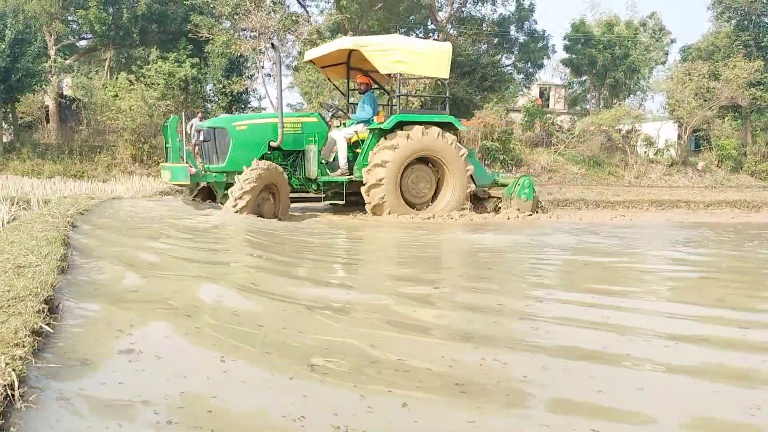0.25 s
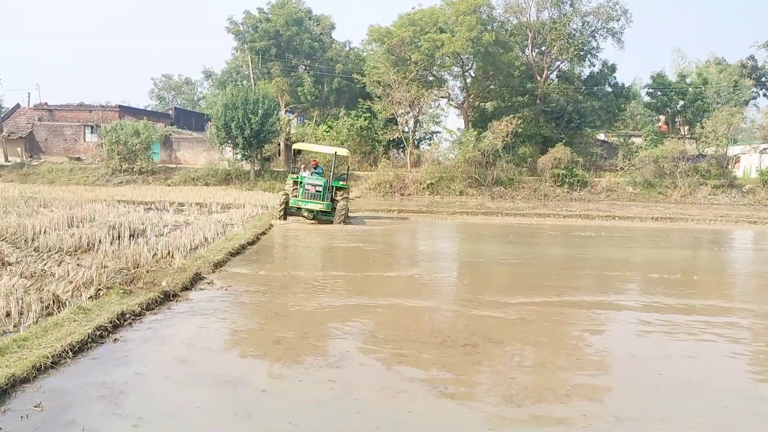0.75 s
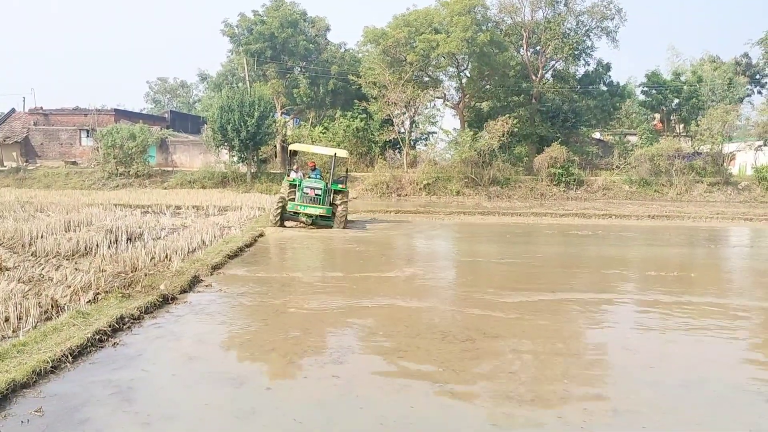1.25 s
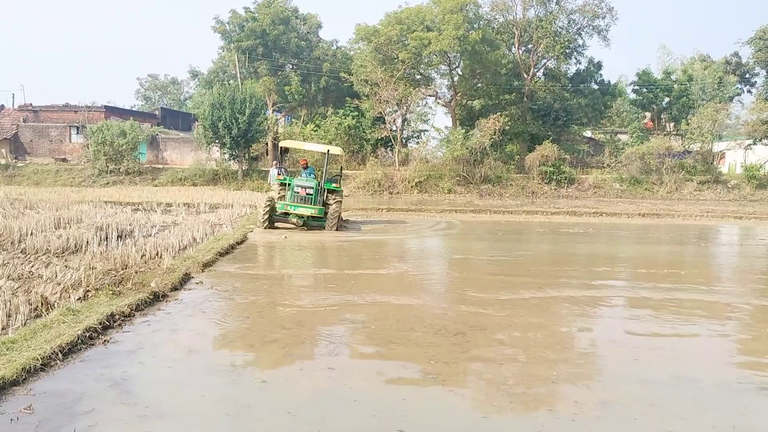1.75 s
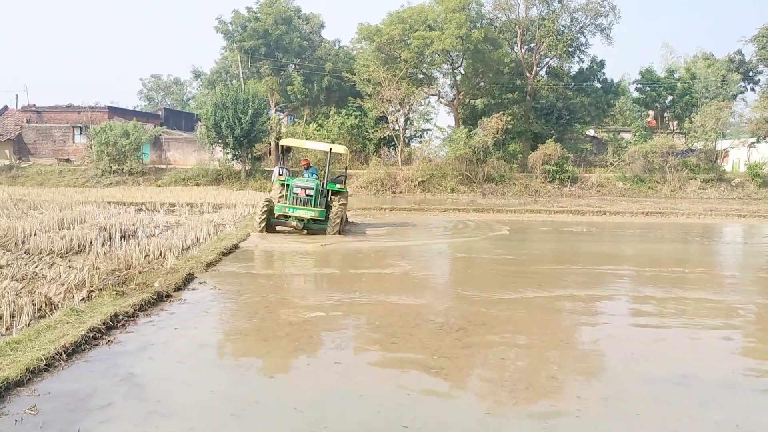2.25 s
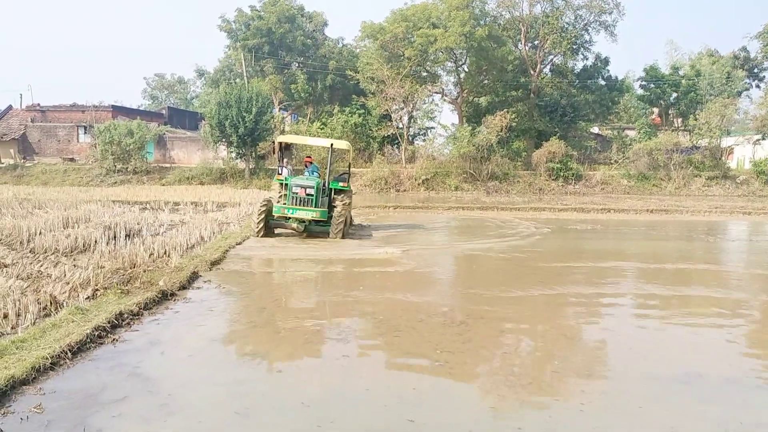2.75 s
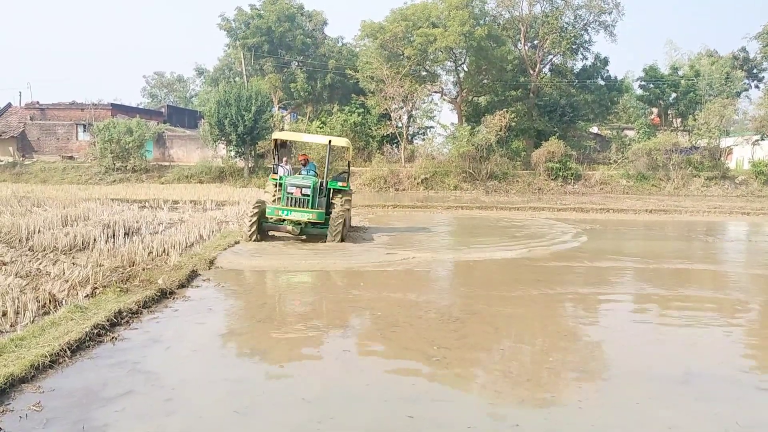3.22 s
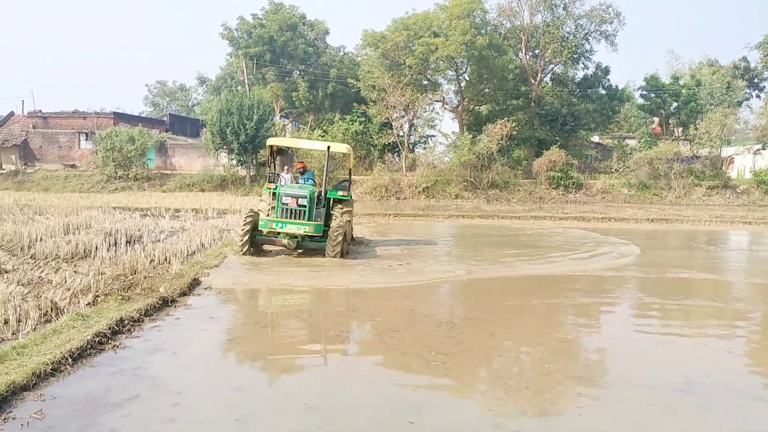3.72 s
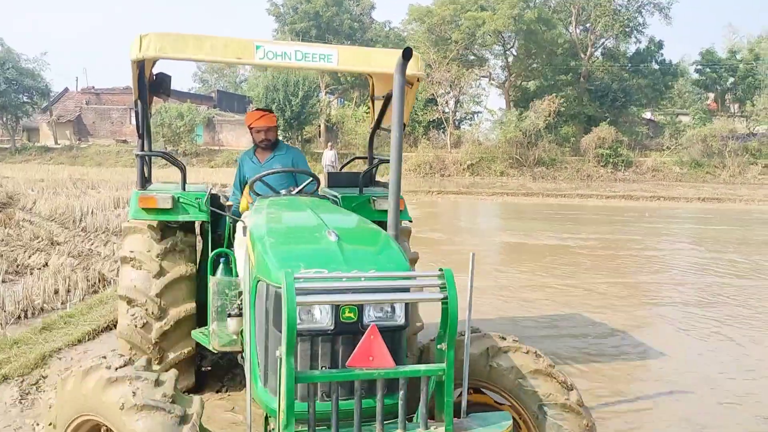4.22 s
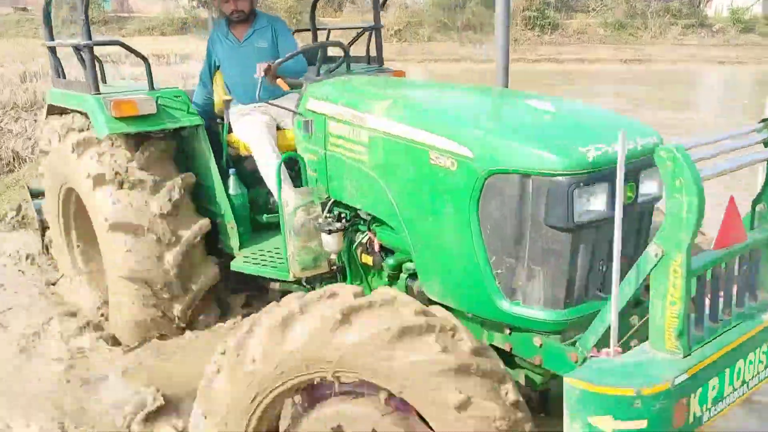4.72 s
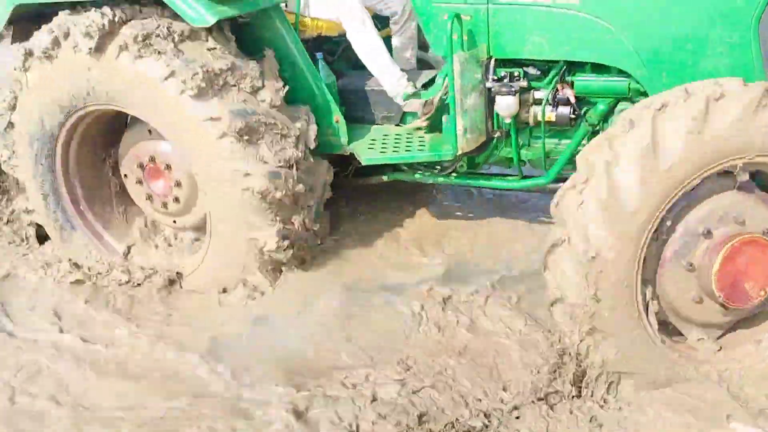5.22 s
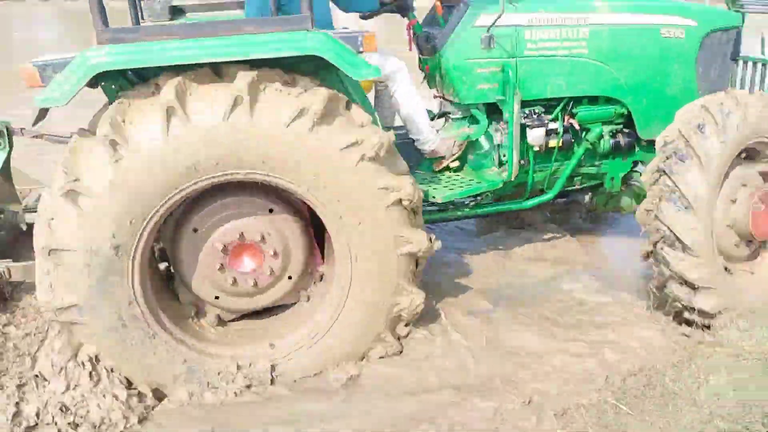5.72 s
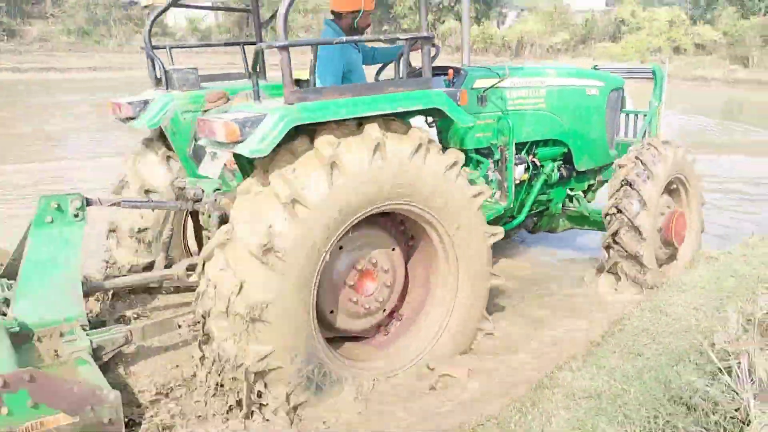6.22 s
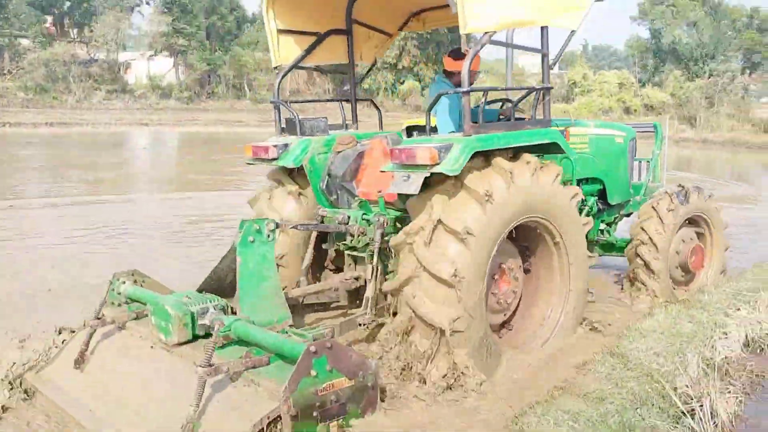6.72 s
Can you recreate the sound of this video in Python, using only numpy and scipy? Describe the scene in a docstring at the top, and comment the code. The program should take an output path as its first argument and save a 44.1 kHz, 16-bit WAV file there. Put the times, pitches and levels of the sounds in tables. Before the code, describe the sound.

Rapid diesel throbbing and clatter, distant and slowly growing, drop out for a moment before a loud close pass with gear whine, drone and watery slaps.

```python
"""A diesel tractor drags a rotavator through a flooded paddy, heard from three places in turn.
It starts side-on: each firing sends a pulse out of the exhaust and shakes up rumble, clatter and knock.
Soon it is far across the water, slowly growing louder, with runs of injector ticking.
After a moment of silence it passes close by: first the gears whine, then the gearbox rasps, the rotavator
drones, a thin whistle goes past, and near the end a rough, slapping wash swells at 1.5 and 5.7 kHz."""
import sys
import numpy as np
from scipy import signal
from scipy.fft import rfft, irfft
from scipy.io import wavfile

SR = 44100
rng = np.random.default_rng(int(sys.argv[2]) if len(sys.argv) > 2 else 0)


def digitize_waveform(pressure):
    """Quantize a signal to 16-bit integers and store it at the path in sys.argv[1].

    Rows of a 2-D input are taken as channels; values are limited to [-1, 1].
    """
    field = np.atleast_2d(pressure).T
    bounded = np.clip(field, -1, 1)
    quanta = np.round(bounded * 32767).astype(np.int16)
    wavfile.write(sys.argv[1], SR, quanta)


N = 306936
TIME, HZ = np.arange(N) / SR, np.fft.rfftfreq(N, 1 / SR)  # time of each sample, frequency of each bin

# when the far place begins, the silence begins and the close pass begins [s]
FAR_AT, SILENT_AT, NEAR_AT = 0.24, 3.9256, 4.256

# engine speed, held by the governor but sagging once under load: (time [s], rate [firings per second])
SPEED = [(0, 38.75), (0.65, 38.1), (1.35, 38.0), (2.15, 37.6), (2.6, 38.0), (3.3, 37.85), (4.7, 37.95),
         (5.13, 36.2), (5.43, 38.2), (6.96, 37.85)]
# the beat skips ahead (+) or back (-) by part of a firing: (time [s], skip [cycles])
SKIPS = [(0.249, .33), (1.355, -0.3727), (1.845, -0.4034), (1.96, -.35), (2.445, -.28), (2.77, 0.465),
         (3.075, -0.3326), (3.375, -0.334), (3.489, -0.279), (3.864, -0.2506), (4.25, 0.4495),
         (4.798, 0.449), (5.285, 0.3955), (5.449, 0.496), (5.572, -0.486), (5.77, -0.407), (6.321, 0.371),
         (6.445, -0.189), (6.658, .45), (6.76, -.45)]
# make-up of the exhaust pulse at each place: (multiple of the firing rate [-], relative level [dB])
SIDE_ORDERS = [(2, 4), (3, 3), (4, 1.5), (5, -21), (6, -16), (7, -31.5), (8, -7.5), (9, -20), (10, -6)]
FAR_ORDERS = [(2, -0.5), (3, -0.5), (4, -1), (5, -47.5), (6, -9.5), (7, -14), (8, -6.5), (9, -11.5),
              (10, -24)]
NEAR_ORDERS = [(2, -1.5), (3, -4.5), (4, -4), (5, -13.5), (6, -31), (7, -18.5), (8, -15.5), (9, -28),
               (10, -16)]
# colour of the engine noise at each place: (frequency [Hz], relative level [dB per Hz])
SIDE_COLOUR = [(60.0, -6.5), (150.0, -2), (330.0, -4), (520.0, -6.5), (850.0, -18), (1500.0, -19.5),
               (2300.0, -26), (3000.0, -17.5), (3900.0, -25.5), (4900.0, -28.5), (7000.0, -28.5),
               (8800.0, -46), (12000.0, -40), (15700.0, -42)]
FAR_COLOUR = [(60.0, -4.5), (150.0, 0), (330.0, -3), (520.0, -2.5), (850.0, -8), (1500.0, -16.5),
              (2300.0, -9.5), (3000.0, -16), (3900.0, -23), (4900.0, -32.5), (7000.0, -32), (8800.0, -49),
              (12000.0, -41.5), (15700.0, -46.5)]
NEAR_COLOUR = [(60.0, -3.5), (150.0, -2), (330.0, 1), (520.0, -1.6), (850.0, -5.5), (1500.0, -15.5),
               (2300.0, -13.5), (3000.0, -12.5), (3900.0, -18), (4900.0, -26), (7000.0, -27.5),
               (8800.0, -42.5), (12000.0, -34), (15700.0, -37)]
# notches in each microphone port's own colour; a plus level is a slight lift:
# (frequency [Hz], width [Hz], level [dB])
SIDE_NOTCHES = ([(500, 150, 1), (1065, 120, -34), (1630, 230, -28)], [(660, 300, 1), (1600, 400, -7),
                (8500, 2300, -2)])  # two lists: left port, right port
FAR_NOTCHES_LEFT = [(516, 388, -17.8), (1288, 478, -9.6), (2218, 800, -22), (3006, 599, -9.8),
                    (5180, 450, -10)]
FAR_NOTCHES_RIGHT = [(637, 400, -22.2), (1690, 250, -9), (5200, 300, -5), (8219, 3858, -20.8)]
NEAR_NOTCHES_LEFT = [(513, 270, -13.5), (2240, 120, -4), (3160, 4100, -4.4)]
NEAR_NOTCHES_RIGHT = [(709, 380, -14.5), (1400, 490, -3), (8750, 1500, -8)]
# how alike the noise is at left and right: (frequency [Hz], likeness [0 to 1])
SIDE_SAME = [(300, 0.98), (900, 0.95), (1600, 0.26), (3500, 0.086)]
FAR_SAME = [(1650, 1.0), (2500, .8), (3500, .45), (6000, .4), (12000, .05)]
NEAR_SAME = [(300, 1), (900, 0.92), (1600, 0.12), (3500, 0.033)]
# layers: exhaust, lowest throb, rumble, growl, rattle, knock, fizz. Far off, each grows as the tractor nears;
# close by, each builds up, then swells as its part of the machine comes abreast:
# (side-on level [dB], far level [dB], far growth [dB per s], close level [dB], change on arrival [dB],
#  time abreast [s], swell width [s], swell [dB])
LAYERS = [(-20, -26.5, 1.26, -21, -4, 5.25, 0.62, 3.5), (-32, -35.5, 0.9, -33.5, -10, 4.6, .85, 9),
          (-25, -28.5, .4, -20, -3, 6.08, 0.37, 3), (-25.5, -34, 0.62, -25.5, -3.5, 4.75, 0.53, 2.5),
          (-34.5, -36, 0.38, -31, -2.5, 4.9, .9, 2.5), (-35, -39.5, 1.21, -30.5, -5, 5.0, 1, 1.5),
          (-47, -62.5, 1.54, -45.5, -12, 5.82, .22, 1)]
# runs of injector ticking: (middle [s], half length [s], level [dB])
TICK_RUNS = [(1.08, 0.24, -43), (1.65, 0.3, -40.5), (2.95, 0.35, -39.5)]
# spells of gear whine, before the left and right gains: (middle [s], half length [s], level [dB])
WHINE_SPELLS = [(4.95, 0.34, -24.5), (5.407, 0.092, -25), (6.85, 0.23, -29.5)]
# the gearbox rasps as it goes past, before the right gain: (middle [s], half length [s], level [dB])
RASP_PASS = [(5.98, 0.63, -32)]
# pitch of the rotavator's drone, dragged down by the mud: (time [s], pitch [Hz])
DRONE_PITCH = [(5.6, 379.4), (6.1, 366), (6.55, 379.6), (6.96, 370.7)]
# spells of the drone, before the left and right gains: (middle [s], half length [s], level [dB])
DRONE_SPELLS = [(5.68, 0.19, -28), (6.11, 0.21, -23), (6.66, 0.32, -21)]
# a thin high whistle, probably the turbocharger, as the engine's side goes past:
# (middle [s], half length [s], level [dB])
WHISTLE_PASS = [(5.82, .2, -50)]
# a rough, slapping wash swells near the end: (middle [s], half length [s], level [dB])
WASH_SWELL = [(6.87, 0.31, -35)]
# the two bands of the wash: (frequency [Hz], width [Hz], relative level [dB])
WASH_BANDS = [(1520, 490, 0), (5700, 1300, -10)]


def amp(db):
    """Turns decibels into a gain."""
    return 10 ** (np.asarray(db) / 20)


def evened(x):
    """Scales a sound to rms 1; a stereo pair is scaled by the average of its two sides."""
    middle = np.atleast_2d(x).mean(0)
    return x / np.sqrt(np.mean(middle ** 2) + 1e-20)


def curves(rows):
    """Reads a table against time, giving each column a value at every sample."""
    times, *columns = np.transpose(rows)
    return [np.interp(TIME, times, column) for column in columns]


def read(points):
    """Reads a table against frequency, giving a value at every bin."""
    hz, value = np.transpose(points)
    return np.interp(np.log(HZ + 1), np.log(hz + 1), value)


def below(hz, order=8):
    """Gain that keeps what lies below a frequency."""
    return 1 / np.sqrt(1 + (HZ / hz) ** (2 * order))


def above(hz, order=8):
    """Gain that keeps what lies above a frequency."""
    return np.sqrt(1 - below(hz, order=order) ** 2)


def resonance(hz, width_hz):
    """Response of a part that rings around one frequency, falling off steeply."""
    return 1 / (1 + 2j * (HZ - hz) / width_hz) ** 2


def wander(hz):
    """A random drift of rms 1, with little change faster than hz."""
    noise = rfft(rng.standard_normal(N))
    return evened(irfft(noise * below(hz, order=3), N))


def hiss(envelope):
    """Spectra of two unrelated noises that rise and fall together."""
    return rfft(rng.standard_normal((2, N)) * evened(envelope))


def spells(rows):
    """Gain that rises, holds and falls around the middle of each spell."""
    return sum(amp(db) * np.exp(-((TIME - middle) / half_s) ** 4) for middle, half_s, db in rows)


def notches(rows):
    """Notches in the colour of one port, each with its swing of phase."""
    response = 1
    for hz, width_hz, db in rows:
        offset = 2j * (HZ - hz) / width_hz
        response = response * (amp(db) + offset) / (1 + offset)
    return response


def ports(left, right, lag_s, left_db=.5):
    """Response of two microphone ports; sound reaches the right one later."""
    delay = np.exp(-2j * np.pi * HZ * lag_s)
    return np.array([amp(left_db) * notches(left), notches(right) * delay])


def layer_levels():
    """Levels in dB of every layer: steady side-on, growing far off, swelling in the close pass."""
    columns = np.transpose(LAYERS)[:, :, None]
    side_db, far_db, growth, close_db, arrival_db, abreast_s, width_s, swell_db = columns
    arriving = np.exp(-np.maximum(TIME - NEAR_AT, 0) / 0.14)  # dies away over 0.14 s
    passing = np.exp(-((TIME - abreast_s) / width_s) ** 2)
    far_now = far_db + growth * (TIME - FAR_AT)
    near_now = close_db + arrival_db * arriving + swell_db * passing
    return side_db, far_now, near_now


def firing_count(jitter=.004, skip_s=0.0062):
    """Counts firings by adding up the engine speed, with slight unevenness and the skips."""
    rate, = curves(SPEED)
    skipped = sum(cycles * (.5 + .5 * np.tanh((TIME - s) / skip_s)) for s, cycles in SKIPS)
    uneven_rate = rate * (1 + jitter * wander(17))
    return .82 + np.cumsum(uneven_rate) / SR + skipped  # .82: where in its cycle the engine starts


def exhaust(turns, orders, exhaust_db, throb_db, rough, spread):
    """One pulse a firing, built of sine waves; the pipe smears the upper ones and no two pulses are alike."""
    pulses = 0
    for k, db in orders:
        flutter = 1 + rough * (wander(9.3) + 1j * wander(18))
        smear = spread * (k - 3) ** 2
        wave = np.exp(2j * np.pi * k * turns - 1j * smear)
        pulses = pulses - amp(db) * (flutter * wave).real
    throb = evened(np.cos(2 * np.pi * turns))
    return amp(exhaust_db) * evened(pulses) - amp(throb_db) * throb


def bursts(turns, delay, decay, uneven_db, steady):
    """Envelope of one dying burst a firing, of varied strength, over a steady part; times in cycles."""
    which, phase = np.divmod(turns - delay + 2, 1)  # + 2 keeps the burst number positive
    strengths = amp(uneven_db * rng.standard_normal(N // 100))
    strength = strengths[which.astype(int)]
    return steady + evened(strength * np.exp(-phase / decay))


def spatter(per_s=70, size_db=3.5, decay_s=0.0017):
    """Envelope of mud clots and drops slapping the water: random hits that die away fast."""
    hits = rng.random(N) < per_s / SR
    drops = hits * amp(size_db * np.minimum(rng.exponential(1, N), 4))
    return signal.lfilter([1], [1, -np.exp(-1 / (decay_s * SR))], drops)


def tractor(turns, levels, orders, colour, pair, same, rough, spread, gas_steady, knock_steady, mud_db, bass_hz):
    """Exhaust pulses plus noise bursts from gas, block and panels, as heard from one place."""
    exhaust_db, throb_db, rumble_db, growl_db, rattle_db, knock_db, fizz_db = levels
    likeness = np.clip(read(same), 0, 1)
    response = amp(read(colour)) * pair

    def heard(noise, db):
        """Colours a noise pair, makes its sides partly alike and sets its level."""
        right = likeness * noise[0] + np.sqrt(1 - likeness ** 2) * noise[1]
        return amp(db) * evened(irfft(np.array([noise[0], right]) * response, N))

    pipe = irfft(rfft(exhaust(turns, orders, exhaust_db, throb_db, rough, spread)) * pair, N)

    # gas rushes out behind each pulse
    gas = hiss(bursts(turns, delay=-.08, decay=0.94, uneven_db=1.7, steady=gas_steady))
    rumble = gas * below(541) * above(bass_hz, order=2)

    # the block and the panels answer higher up
    block = hiss(bursts(turns, delay=.05, decay=0.57, uneven_db=2.5, steady=3.8))
    growl = block * above(593) * below(1590)
    panels = hiss(bursts(turns, delay=0.05, decay=0.23, uneven_db=3, steady=3.6))
    rattle = panels * above(1635) * below(2660)

    # diesel knock: one sharp crack a firing, mixed with the slap of mud
    cracks = hiss(bursts(turns, delay=.02, decay=0.22, uneven_db=4.0, steady=knock_steady))
    cracks = cracks + amp(mud_db) * hiss(spatter())
    knock = cracks * above(3280) * below(8100)

    # finest spray, smoother than the knock
    fizz = (cracks + 1.2 * hiss(np.ones(N))) * above(9200)

    low = pipe + heard(rumble, rumble_db)
    middle = heard(growl, growl_db) + heard(rattle, rattle_db)
    return low + middle + heard(knock, knock_db) + heard(fizz, fizz_db)


def injectors(turns, hz=3870, width_hz=260, decay=0.077):
    """A sharp tick a firing rings the steel of the injection gear."""
    ticks = hiss(bursts(turns, delay=-0.011, decay=decay, uneven_db=1.0, steady=.1))
    shared = ticks + 0.18 * ticks[::-1]  # each side also hears a little of the other
    return spells(TICK_RUNS) * evened(irfft(shared * resonance(hz, width_hz), N))


def gear_tone(hz, rows, rough, waver_hz):
    """A tone from meshing teeth that wavers with the load on them."""
    waver = 1 + rough * (wander(waver_hz) + 1j * wander(waver_hz))
    wave = np.exp(2j * np.pi * np.cumsum(hz) / SR)
    return spells(rows) * evened((waver * wave).real)


def gear_whine(order=19.45, left_db=2.5, right_db=-7):
    """Gears whine at a fixed multiple of the firing rate, mostly at the left."""
    rate, = curves(SPEED)
    return gear_tone(order * rate, WHINE_SPELLS, rough=0.42, waver_hz=22) * amp([[left_db], [right_db]])


def gearbox(hz=2250, width_hz=650, right_db=3):
    """Sliding teeth excite one broad resonance of the gear case."""
    rasp = irfft(hiss(1 + 0.21 * wander(60)) * resonance(hz, width_hz), N)
    return spells(RASP_PASS) * evened(rasp) * amp([[0], [right_db]])


def rotavator_drone(left_db=-3.5, right_db=-.8):
    """The rotavator's gears drone at a pitch dragged down by the mud."""
    pitch, = curves(DRONE_PITCH)
    return gear_tone(pitch, DRONE_SPELLS, rough=0.3, waver_hz=10) * amp([[left_db], [right_db]])


def whistle(hz=12000, width_hz=1100, left_db=-7):
    """Rushing air in one high resonance, mostly at the right port."""
    air = irfft(hiss(np.ones(N)) * resonance(hz, width_hz), N)
    return spells(WHISTLE_PASS) * evened(air * amp([[left_db], [0]]))


def slapping_wash():
    """Random slaps over a steady hiss, ringing in two bands."""
    colour = sum(amp(db) * resonance(hz, width_hz) for hz, width_hz, db in WASH_BANDS)
    slaps = hiss(1.5 + evened(spatter()))
    return spells(WASH_SWELL) * evened(irfft(slaps * colour, N))


def scene():
    """Plays the three listening places one after the other, with silence before the last."""
    turns = firing_count()
    side_levels, far_levels, near_levels = layer_levels()

    side_ports = ports(*SIDE_NOTCHES, lag_s=0.00013)
    side = tractor(turns, side_levels, SIDE_ORDERS, SIDE_COLOUR, side_ports, SIDE_SAME, rough=0.084,
                   spread=.15, gas_steady=1.2, knock_steady=6.1, mud_db=-11.5, bass_hz=130)

    far_ports = ports(FAR_NOTCHES_LEFT, FAR_NOTCHES_RIGHT, lag_s=.000242)
    far = tractor(turns, far_levels, FAR_ORDERS, FAR_COLOUR, far_ports, FAR_SAME, rough=0.13,
                  spread=0.252, gas_steady=1.6, knock_steady=2.8, mud_db=-26.5, bass_hz=125)
    far = far + injectors(turns)

    near_ports = ports(NEAR_NOTCHES_LEFT, NEAR_NOTCHES_RIGHT, lag_s=0.00021)
    near = tractor(turns, near_levels, NEAR_ORDERS, NEAR_COLOUR, near_ports, NEAR_SAME, rough=0.15,
                   spread=0.196, gas_steady=2.5, knock_steady=3.9, mud_db=-11.5, bass_hz=70)
    near = near + gear_whine() + gearbox() + rotavator_drone() + whistle() + slapping_wash()

    to_far = np.clip((TIME - FAR_AT) / 0.014 + .5, 0, 1)
    fade_out = np.clip((SILENT_AT - TIME) / .001 + .5, 0, 1)
    fade_in = np.clip((TIME - NEAR_AT) / .026, 0, 1) ** 1.5
    return side * (1 - to_far) + far * to_far * fade_out + near * fade_in


def record(dry, edge_hz=15820):
    """The recorder cuts off everything above its band limit."""
    low_pass = signal.firwin(1023, edge_hz, window=("kaiser", 9), fs=SR)
    return signal.oaconvolve(dry, low_pass[None], "same")


dry = scene()
out = record(dry)
digitize_waveform(out)
```